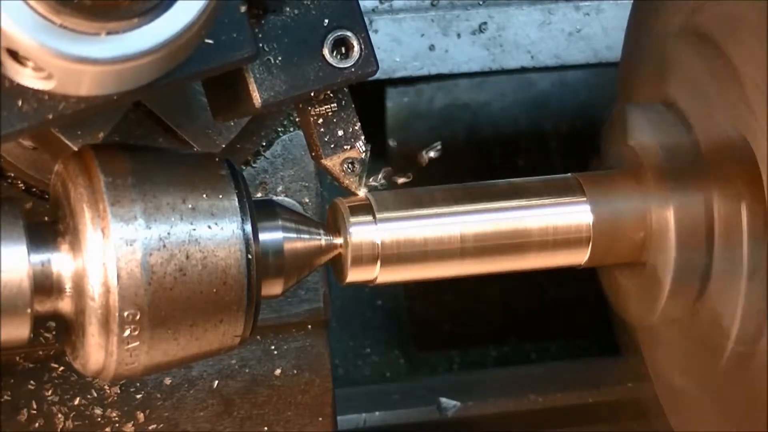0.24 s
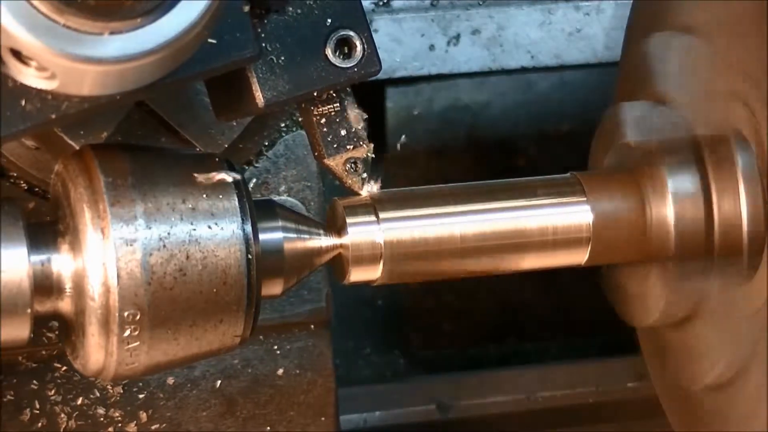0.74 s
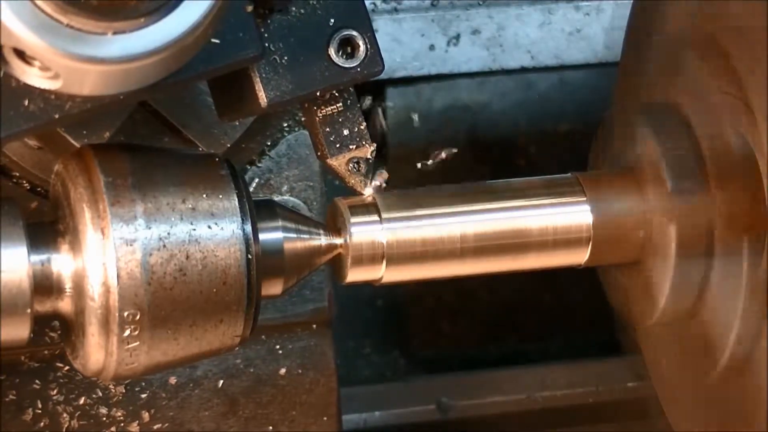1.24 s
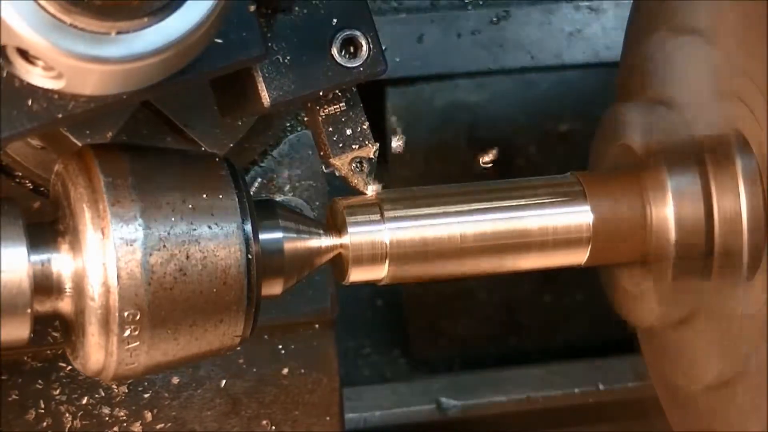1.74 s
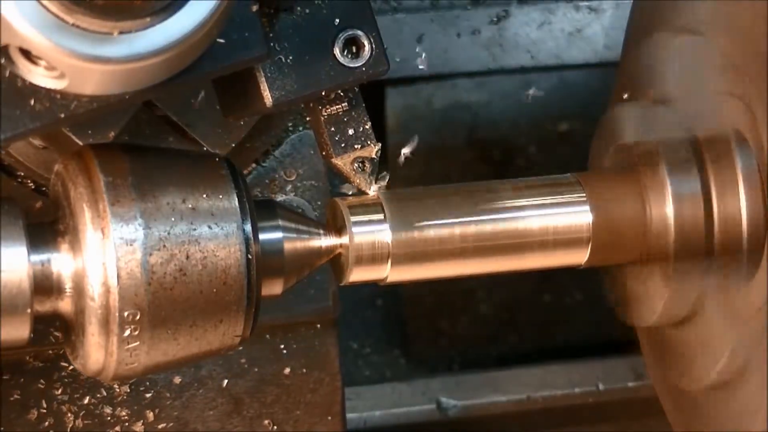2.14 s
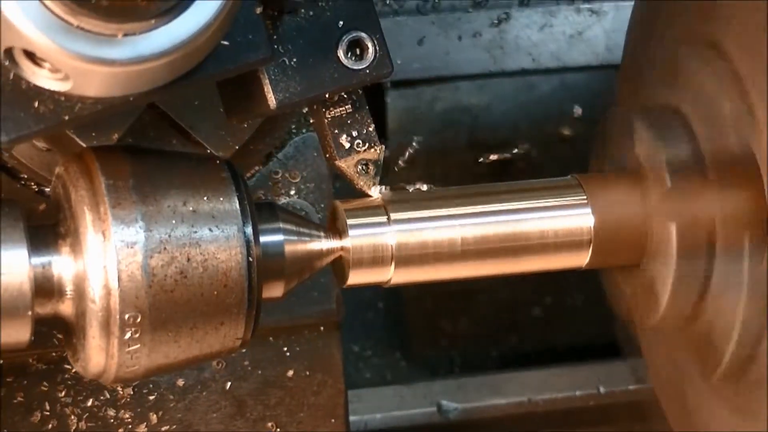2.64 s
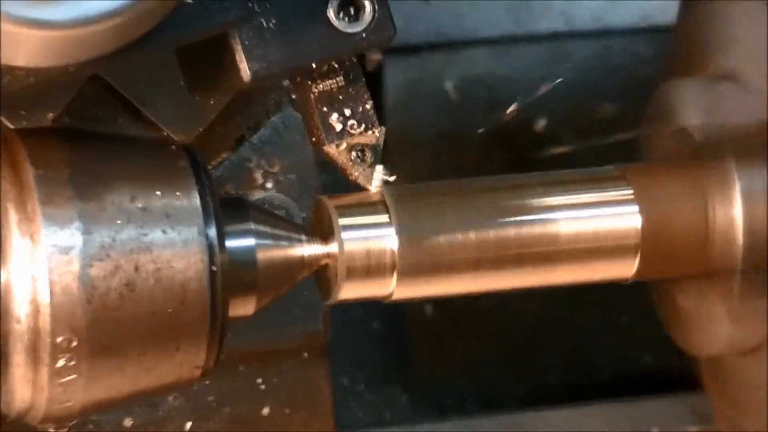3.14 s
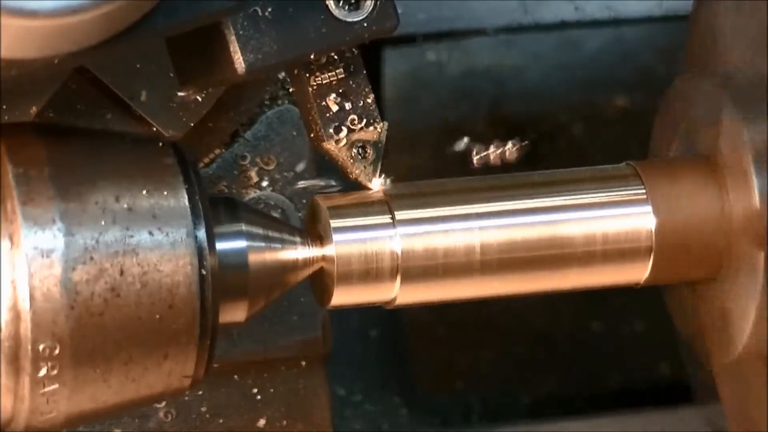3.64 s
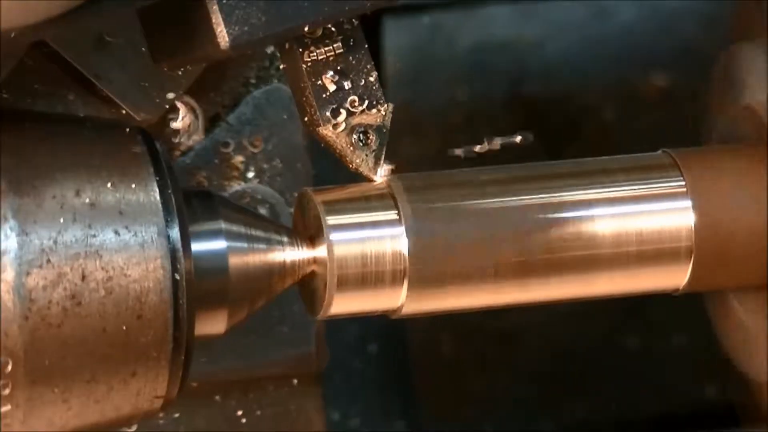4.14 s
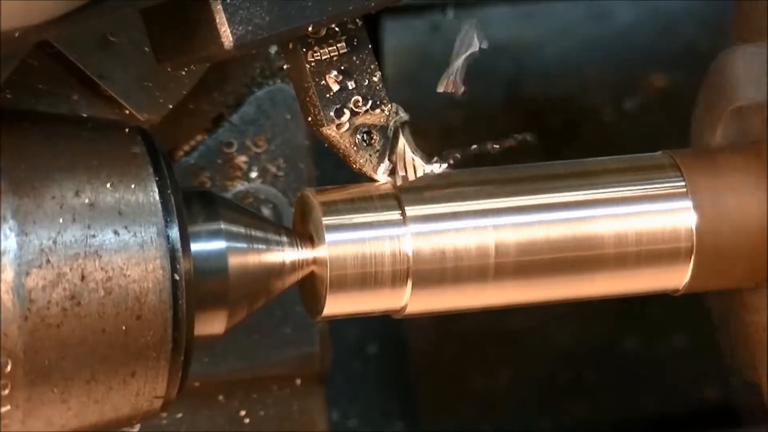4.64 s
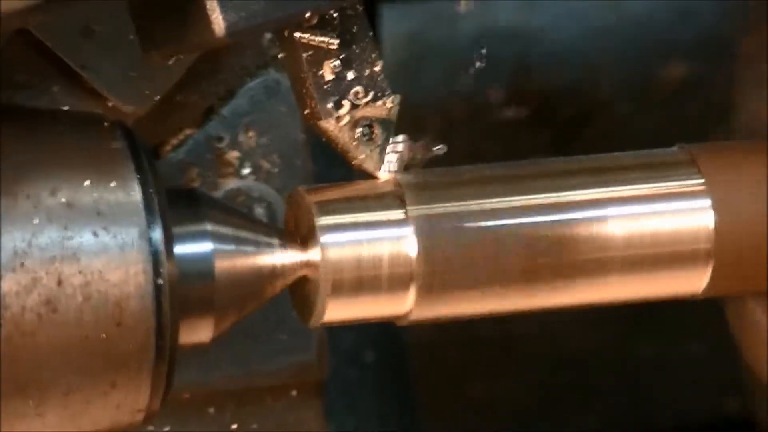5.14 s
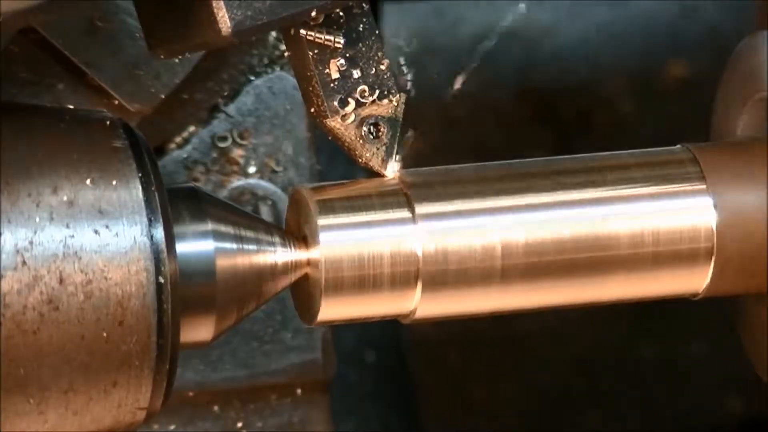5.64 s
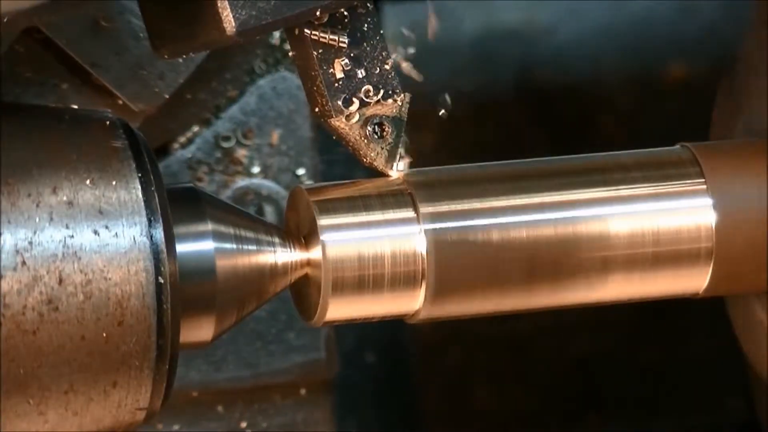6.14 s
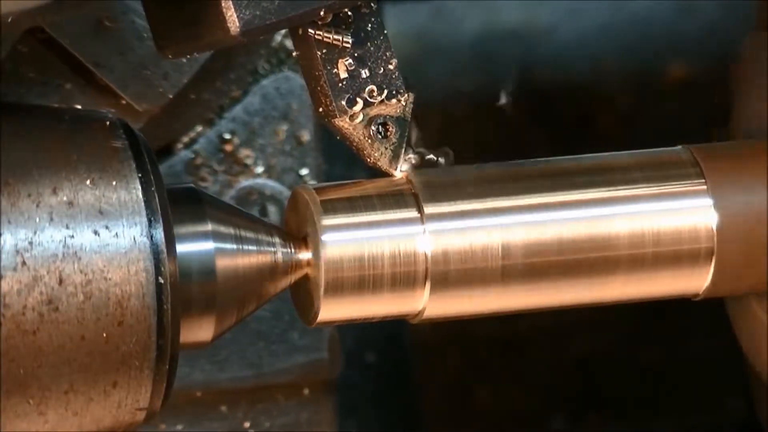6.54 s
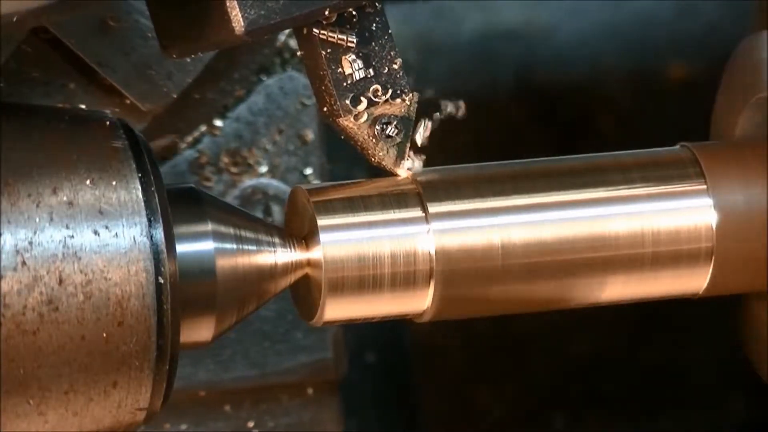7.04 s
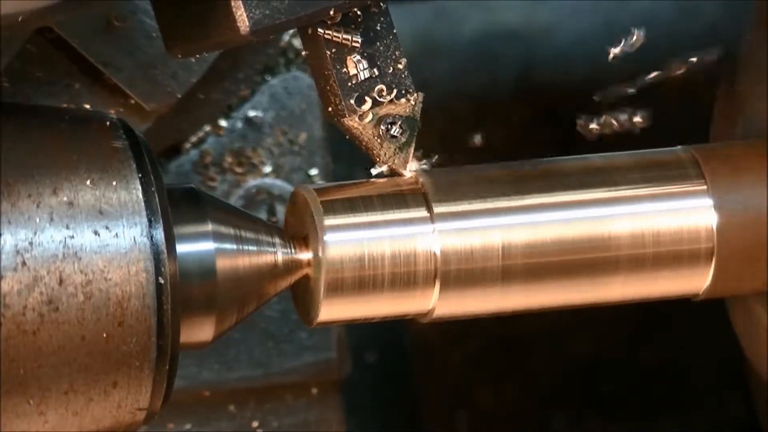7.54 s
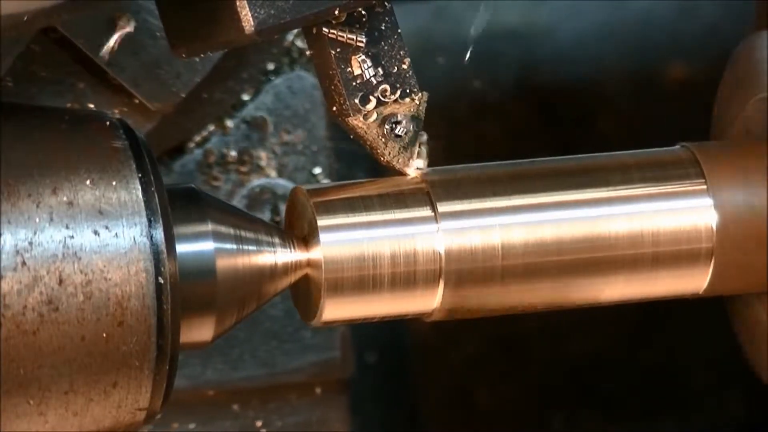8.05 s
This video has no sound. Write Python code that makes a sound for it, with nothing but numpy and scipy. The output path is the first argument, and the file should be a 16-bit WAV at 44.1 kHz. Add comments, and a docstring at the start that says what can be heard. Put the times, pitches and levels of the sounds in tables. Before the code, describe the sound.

Continuous loud lathe noise in close stereo: motor hum, steady gear tones and gritty, resonant metallic roar. The cut adds a rapid rotating throb, bright hiss, thin whistling chirps and irregular short pings. Small swarf pieces patter sharply on metal, often leaning left. Handling knocks come mostly between two and four seconds, another around five, with no start or stop.

```python
"""Roughing cut on a geared lathe

A carbide tool roughs a round bar turning about eleven times a second, heard from close by.
Hum and gear tones are wavering sines and combs of thin lines under the roar of the headstock, which is
noise coloured by the castings. The cut hisses, rings the tool, squeals and throws chips as short ticks.
Most of it throbs with the turn of the spindle; now and then a hand bumps the camera with a low knock."""
import sys
import numpy as np
from scipy import signal
from scipy.fft import rfft, irfft
from scipy.io import wavfile
from scipy.ndimage import uniform_filter1d

SR = 44100
rng = np.random.default_rng(int(sys.argv[2]) if len(sys.argv) > 2 else 0)


def master_out(mix):
    """Clip the mix to full scale and print it as 16-bit PCM to the path in sys.argv[1]."""
    frames = np.transpose(np.atleast_2d(mix))
    ceiling = np.clip(frames, -1, 1)
    pcm = np.round(ceiling * 32767).astype(np.int16)
    wavfile.write(sys.argv[1], SR, pcm)


N = 365148
T, HZ = np.arange(N) / SR, np.fft.rfftfreq(N, 1 / SR)

TURN_HZ = 10.9443  # spindle turns a second
MAINS_HZ = 120.02  # the motor's magnetic pull
MESH_TEETH, LAYSHAFT = 30, .4412  # teeth on the spindle gear; turns of its mate per spindle turn
CAGE, BALLS = .399, 1.601  # beats of the live centre's bearing per spindle turn

# Motor hum: multiple of the magnetic pull, level/dB
HUM = [(1, -59), (2, -50.5), (4, -38.5), (8, -56)]
# Strongest gear tones: multiple of the turn, level/dB
GEARS = [(24, -35), (24.44, -50), (25, -54.5), (30, -53), (31, -53), (33, -52.5), (38, -53.5), (48, -64),
         (54, -51.5), (59, -55), (60, -48), (65, -47), (83, -39.5), (84, -53), (90, -41.5), (91, -41.5),
         (92, -42.5), (95, -53), (102, -39.5), (104, -48), (105, -42.5), (119, -50), (120, -37),
         (127, -44.5), (150, -43)]
# Other tones of the drive: f/Hz, level/dB
TONES = [(1509.5, -44.5), (2490.7, -44.5)]
# Weaker gear orders, before the castings colour them: f/Hz, level/dB of each
TEETH = [(270, -76), (350, -55), (520, -71), (800, -53), (1100, -51.5), (1700, -55), (2200, -70),
         (2600, -61)]
# Broad colour of the roar, relative: f/Hz, level/dB per Hz
ROAR = [(20, -43), (100, -42), (230, -24.5), (440, -18.5), (520, -11), (570, -16.5), (830, -11), (950, -9),
        (2900, -8.5), (3400, -11.5), (5800, -11), (7200, -21.5), (11900, -38), (15600, -49)]
# Resonances of headstock, bar and tool post: f/Hz
CASTING_HZ = [995, 1035, 1130, 1203, 1312, 1480, 1570, 1642, 1760, 1878, 2058, 2097, 2260, 2605, 2799, 2897,
              2960, 3060, 3123, 3278, 3608, 3902, 4070, 4525, 4750, 4970, 5289, 5700, 6600, 530, 2295, 4265,
              4375, 4890, 6230]
# Shape of each of those resonances, in the same order: width/Hz, level/dB
CASTING_SHAPE = [(56, -13.5), (25, -30), (60, -9), (30, -6), (32.407, -26), (60, -10), (35, -9.5),
                 (34.8, -5), (50, -10), (80, -3), (30, -8), (30, -5), (120, -28), (80, -6), (39.3, -2),
                 (50, -3.5), (50, -6.5), (40, -5.5), (30, -4), (25, -3.5), (40, -5), (50, -4.5), (60, -8),
                 (80, -3.5), (140, -8), (50, -5), (80, -6), (270, -10.5), (300, -13.5), (30, -16.5),
                 (30, -5.5), (50, -16), (50, -6), (70, -8.5), (50, -20)]
# Notches where neighbouring modes cancel: f/Hz
NODES_HZ = [430, 555, 850, 1070, 1180, 1412, 1610, 2015, 2155, 2345, 2690, 2850, 4160]
# Course of the load, used about each column's mean:
# t/s, machine level/dB, cut hiss against the roar/dB, motor drone against the roar/dB
LOAD = [(0.0, -14.5, -13.5, 0.5), (1.5, -14, -15.5, 2), (2.7, -15, -14, 3), (4.2, -14.5, -14, 3),
        (5.3, -14, -17.5, 2.5), (5.8, -14, -15, 1), (8.28, -14.5, -16.5, 0.5)]
# Swell of each band of the roar at the bar's high spot: f/Hz, depth/dB per unit of swell
BITE = [(300, 1), (620, 0.2), (950, -4.5), (1600, 1), (2500, 0.52), (5500, -0.5), (8000, 2.7), (12000, 2)]
# Rattle of the gear train: beats a turn, depth/dB, first peak t/s
RATTLE = [(2, .7, .008), (4, .4, .001), (5, .55, .017), (11, .4, .002), (30, .7, .001)]
# Rings of the tool: f/Hz, width/Hz, level/dB rms, cage throb/dB, cage peak t/s, turn throb/dB
RINGS = [(4622, 128.3, -27, 2.0, 0.12, 2.5), (6150, 99.3, -31.5, 2.5, 0.21, 1),
         (8350, 1100, -37.5, 0, 0.14, 0.7), (9490, 49, -46.5, 3.5, 0.12, 0), (11240, 650, -49, 0, .13, 1.8)]
# Loudest breaks of the chip, near the bar's high spot: t/s, level/dB, f/Hz
PINGS = [(0.181, -19, 2240), (0.7277, -25, 2280), (1.0934, -21, 2270), (1.4576, -17, 2250),
         (1.5489, -19, 2190), (2.0991, -19, 2270), (2.1884, -19, 2180), (2.2812, -24, 2180),
         (2.3735, -18, 2260), (2.7357, -21, 2240), (2.828, -16, 2190), (2.921, -19, 2200),
         (3.011, -15, 2290), (3.1941, -19, 2260), (3.7444, -26, 2170), (3.927, -18, 2255),
         (4.1121, -20, 2170), (4.2911, -17, 2170), (4.3809, -17, 2260), (5.2051, -21, 2200),
         (5.474, -18, 2170), (8.2187, -21, 2180)]
# Loud chips landing: t/s, level/dB, body against the tick/dB, left over right/dB
CHIPS = [(0.7282, -25, -5, -3.0), (2.0083, -20, -6, -5), (2.2837, -22, 3, -4), (2.372, -17, -7, -4),
         (2.4149, -21, 5, -4), (2.5576, -17, -16, -3.5), (2.6594, -28, -2, -3), (2.7362, -26, -2, -7),
         (2.9113, -18, -9, -3), (3.2056, -23, 1, -3), (3.2824, -16, -4, -4), (3.5568, -24, -3, 1),
         (3.7529, -19, -7, -1), (5.2026, -21, 3, -5), (7.5113, -21, -3, -6), (7.6929, -21, -2, -5),
         (7.7638, -23, 3, -3), (7.9598, -25, 1, -4.0), (8.0556, -23, -3, -6.5), (8.1289, -23, -3, -3.0)]
# Throb of the squeal: beats a turn, depth/dB, first peak t/s
SQUEAL_THROB = [(CAGE, 1, 0.23), (2 * CAGE, 1.8, 0.045), (BALLS, 3.2, 0.0035), (1.3, 1, .003)]
# Moments when the tool tip breaks into chatter: start t/s, length/s, level/dB
CHIRPS = [(0.218, 0.04, -29), (0.388, 0.027, -23.5), (0.516, 0.029, -23), (0.627, 0.027, -25),
          (0.676, 0.021, -22), (0.727, 0.042, -22), (1.637, 0.036, -26), (1.767, 0.037, -25),
          (1.986, 0.04, -28), (2.04, 0.023, -23), (2.215, 0.03, -23), (2.54, 0.045, -27.5),
          (2.73, 0.025, -25), (3.42, 0.018, -19.5), (3.826, 0.024, -26), (4.148, 0.025, -22),
          (4.375, 0.028, -26), (4.514, 0.037, -27), (4.555, 0.031, -28), (4.774, 0.032, -26),
          (4.836, 0.041, -27), (4.947, 0.036, -26), (5.01, 0.031, -24), (5.065, 0.018, -20),
          (5.206, 0.041, -26), (5.47, 0.026, -27), (5.917, 0.079, -26), (6.11, 0.036, -25),
          (6.37, 0.03, -26), (6.773, 0.064, -24), (7.021, 0.021, -21), (7.124, 0.037, -21.5),
          (7.252, 0.033, -25), (7.287, 0.032, -24), (7.489, 0.027, -24), (7.58, 0.054, -28),
          (7.755, 0.037, -28), (7.826, 0.026, -23.5), (7.963, 0.03, -23.5), (8.208, 0.027, -20)]
# Knocks on the camera: t/s, level/dB, f/Hz
BUMPS = [(2.29, -44, 115), (2.335, -44, 130), (2.412, -38, 140), (2.884, -38, 150), (3.175, -28, 140),
         (3.239, -44, 115), (3.442, -46, 60), (3.872, -43, 125), (3.917, -41, 125), (5.057, -24, 155)]
# Likeness of the two ports: f/Hz, correlation from -1 to 1
SAME = [(60, -0.25), (130, -0.29), (210, 0.88), (500, 0.97), (1200, 0.95), (2700, 0.78), (4200, 0.95),
        (6300, 0.87), (7300, 0.53), (8200, 0.21), (11400, 0.62), (13400, -0.35), (15000, -0.05)]
# Balance of the two ports: f/Hz, left over right/dB
LEAN = [(60, 1), (160, -1), (270, -12.5), (450, -9.5), (740, -8.5), (1220, -5.5), (2010, -2.0),
        (3330, -1.5), (5500, 0.5), (6900, -2), (8300, -11.5), (10400, -0.2), (15000, -0.4)]
# Phase by which the left port leads: f/Hz, lead/rad
LEAD = [(100, .1), (260, .45), (1300, .75), (2700, .2), (3600, .4), (6300, -.25), (7300, -.9), (8400, .6),
        (10700, 0)]


def gain_of(db):
    """Decibels to amplitude."""
    return 10 ** (np.asarray(db) / 20)


def panned_gain(db, pan_db):
    """Left and right gains around a level, pan_db apart."""
    return gain_of(db + np.array([[pan_db / 2], [-pan_db / 2]]))


def evened(x):
    """Scales to rms 1."""
    return x / np.sqrt(np.mean(x ** 2) + 1e-20)


def read(points, hz):
    """Reads a curve on a log-frequency axis."""
    f, value = np.transpose(points)
    return np.interp(np.log(hz + 1), np.log(f + 1), value)


def add(mix, s, sound):
    """Mixes a sound in at s seconds."""
    part = mix[..., round(s * SR):][..., :sound.shape[-1]]
    part += sound[..., :part.shape[-1]]


def drift(hz, count):
    """Random wander of rms 1, smoothed below about hz, one row each."""
    knots = np.arange(0, T[-1] + .01, .005)
    memory = np.exp(-2 * np.pi * hz * knots[1])
    noise = rng.standard_normal((count, len(knots) + 999))
    rows = signal.lfilter([1], [1, -memory], noise)[:, 999:]  # settled part only
    return np.array([np.interp(T, knots, evened(row - row.mean())) for row in rows])


def beats(parts):
    """Sum of cosine throbs in dB, each locked to the spindle: (beats a turn, dB, first peak s)."""
    return sum(db * np.cos(2 * np.pi * k * TURN_HZ * (T - s)) for k, db, s in parts)


def load(axis):
    """One column of the load curve about its mean, in dB."""
    column = np.interp(T, *np.transpose(LOAD)[[0, axis]])
    return column - column.mean()


def mode(hz, width):
    """Squared power response of one resonance, top 1."""
    return 1 / (1 + ((HZ - hz) / (width / 1.8)) ** 2) ** 2


def ports(near, far):
    """Two microphone ports: the left hears a share of what the right hears, the rest from elsewhere."""
    same = np.clip(read(SAME, HZ), -1, 1)
    lean, lead = gain_of(read(LEAN, HZ)), read(LEAD, HZ)
    left = lean * np.exp(1j * lead) * (same * near + np.sqrt(1 - same ** 2) * far)
    # for independent near and far of equal power, the average of the ports keeps the level of near
    level = 2 / np.sqrt(1 + lean ** 2 + 2 * lean * same * np.cos(lead))
    return irfft(np.array([left, near]) * level, N)


def rumble():
    """Hands on the camera: low lumpy noise, largely alike at the two ports, stirred up by each bump."""
    steady_db, after_t60_s = -72, .7
    after_db, after_share = -56, 0.59  # level after a -25 dB bump, and how far it follows the bump
    low = irfft(np.sqrt(mode(92.0, 90.)) * rfft(rng.standard_normal((2, N))), N)
    stirred = 0
    for s, db, hz in BUMPS:
        start_db = after_db + after_share * (db + 25)
        rise = np.clip((T - s) / .02, 0, 1)
        stirred = stirred + rise * gain_of(start_db - 60 * abs(T - s) / after_t60_s)
    lumps = gain_of(2.0 * drift(6., count=1)[0])
    return evened(low + 0.55 * low[::-1]) * (gain_of(steady_db) + stirred) * lumps


def bumps():
    """A low knock of a few cycles through the camera body, its pitch sagging, with a faint scuff."""
    rise, ring, pan_db = 0.5, 1, -4  # cycles to rise, cycles to fade to about a third, left over right
    out = np.zeros((2, N))
    for s, db, hz in BUMPS:
        u = np.arange(6000) * hz / SR  # time in cycles
        sagging = np.cos(2 * np.pi * (u + 0.36 * (1 - np.exp(-u / 0.38))))
        knock = sagging * (1 - np.exp(-(u / rise) ** 2)) * np.exp(-u / ring)
        scuff = np.exp(-u / 1.2) * evened(uniform_filter1d(rng.standard_normal(len(u)), size=70))
        add(out, s, panned_gain(db, pan_db) * (knock / abs(knock).max() + 0.14 * scuff))
    return out


def motor_and_gears():
    """Sine tones that waver a little; the mating gear sways the phase of the mesh tones."""
    lines = [(k * MAINS_HZ, db) for k, db in HUM] + [(k * TURN_HZ, db) for k, db in GEARS] + TONES
    wobble, out = drift(0.75, count=8), np.zeros(N)
    runout = 0.74 * np.cos(2 * np.pi * (TURN_HZ * T - .1))  # the gear bites harder once a turn
    for i, (hz, db) in enumerate(lines):
        pitch_wobble, level_wobble = wobble[i % 4], wobble[4 + i % 4]
        phase = 2 * np.pi * (hz * T + rng.random()) + 0.0013 * hz * pitch_wobble
        if np.isclose(hz / TURN_HZ % MESH_TEETH, 0):
            phase += .85 * np.sin(2 * np.pi * LAYSHAFT * TURN_HZ * T)
        if i < len(HUM):
            sway_db = load(axis=3)
        else:
            sway_db = 0.0017 * hz * (level_wobble - runout)
        out += np.sqrt(2) * gain_of(db + sway_db + 0.78 * level_wobble) * np.sin(phase)
    return out


def housing():
    """Power response of the castings: broad colour plus resonances, notched where modes cancel."""
    node_width_hz, node_depth = 40, 0.68
    peaks = gain_of(read(ROAR, HZ)) ** 2
    for hz, (width, db) in zip(CASTING_HZ, CASTING_SHAPE):
        peaks = peaks + gain_of(db) ** 2 * mode(hz, width)
    nodes = sum(mode(hz, node_width_hz) for hz in NODES_HZ)
    return peaks * np.clip(1 - node_depth * nodes, .05, 1)


def teeth():
    """Tooth errors come round again each turn, some each second turn: a comb of thin lines."""
    order = HZ / TURN_HZ
    comb = 1 / (1 + ((order - np.round(order)) * TURN_HZ / 0.46) ** 2)
    comb += gain_of(-6.0) / (1 + ((order % 1 - .5) * TURN_HZ / 0.5) ** 2)  # each second turn
    line_gains = gain_of(2.5 * rng.standard_normal(4000).clip(-3, 1.5))
    uneven = line_gains[np.round(2 * order).astype(int).clip(0, 3999)]
    resonance = np.sqrt(housing()) / gain_of(read(ROAR, HZ))  # castings without their broad colour
    band = (HZ < TEETH[-1][0]) * (HZ > TEETH[0][0])
    lines = comb * uneven * gain_of(read(TEETH, HZ)) * resonance * band
    return irfft(lines * rfft(rng.standard_normal(N)), N) * np.sqrt(SR / 2)


def squeal():
    """A wavering whistle that swells with the cage and balls of the bearing, and breaks into chirps."""
    squeal_hz, floor_db = 6157, -35.5  # pitch, and level between the chirps, both before they waver
    edge_s = 0.02  # rise and fall of a chirp
    pitch_hz, flutter_db = drift(25., count=2) * [[10.], [2.]]
    level = gain_of(floor_db + beats(SQUEAL_THROB) + 2.4 * drift(9., count=1)[0])
    for s, length, db in CHIRPS:
        shape = np.clip(np.minimum(T - s, s + length - T) / edge_s + .5, 0, 1)
        level = np.maximum(level, gain_of(db) * np.sin(np.pi / 2 * shape) ** 2)
    whistle = np.sin(2 * np.pi * np.cumsum(squeal_hz + pitch_hz) / SR)
    return np.sqrt(2) * level * gain_of(flutter_db) * whistle


def chips():
    """Swarf on bed and guard: noise ticks with a short clack, loud ones over a patter of small ones."""
    out, t = np.zeros((2, N)), np.arange(900) / SR
    bright = signal.butter(2, [6500, 10500], "band", fs=SR)
    small = rng.random((900, 3)) * [T[-1], 14, -12]  # s, dB over the faintest, left over right dB
    patter = [(s, -42.0 + size_db, -3, pan_db) for s, size_db, pan_db in small]
    for s, db, body_db, pan_db in list(CHIPS) + patter:
        hiss = evened(signal.lfilter(*bright, rng.standard_normal(len(t))))
        tick = gain_of(-8.0 - 60 * t / 0.024) * hiss
        swell = t / .0005 * np.exp(1 - t / .0005)  # the body of the chip clacks for a few cycles
        body = gain_of(body_db + 9.0) * swell * np.sin(2 * np.pi * rng.uniform(4400, 5100) * t)
        add(out, s, panned_gain(db, pan_db) * (tick + body))
    return out


def pings():
    """Each break of the chip rings the tool post as a decaying sine with a noise crack, once a turn."""
    t60_s, crack_db = 0.065, -8
    soft_db, spread_db = -19, 26  # softer breaks: loudest, and how far below it they may fall
    out, t = np.zeros(N), np.arange(3000) / SR
    loud_turns = np.round(np.transpose(PINGS)[0] * TURN_HZ)
    chance = rng.random((int(T[-1] * TURN_HZ), 3))
    soft = []
    for turn, (early, softness, pitch) in enumerate(chance, start=1):
        if turn not in loud_turns:
            s = (turn - 0.0517 * early) / TURN_HZ
            soft.append((s, soft_db - spread_db * softness, 2180 + 160 * pitch))
    for s, db, hz in list(PINGS) + soft:
        ring = gain_of(-60 * t / t60_s) * (1 - np.exp(-t / 0.0003)) * np.sin(2 * np.pi * hz * t)
        crack_noise = uniform_filter1d(rng.standard_normal(len(t)), size=5)
        add(out, s, gain_of(db) * (ring + gain_of(crack_db - 60 * t / .012) * crack_noise))
    return out


def rings():
    """Narrow tool resonances driven by the cut; the live centre's bearing and the turn make them throb."""
    wander = 0.12  # rms stray of a ring's pitch, in widths
    out, chatter_db = 0, 1.3 * drift(45., count=1)[0]  # all rings flutter together
    for hz, width, db, cage_db, cage_s, turn_db in RINGS:
        throb_db = beats([(CAGE, cage_db, cage_s), (1, turn_db, .018)])
        noise = rfft(rng.standard_normal((2, N)))
        ring = signal.hilbert(irfft(np.sqrt(mode(hz, width)) * noise, N))
        stray_hz = wander * width * drift(5., count=1)[0]
        ring = (ring * np.exp(2j * np.pi * np.cumsum(stray_hz) / SR)).real
        shape = gain_of(throb_db + drift(12., count=1)[0] + chatter_db)
        out = out + gain_of(db) * rfft(evened(ring * shape))
    return out


def roar():
    """Friction, rattle and cut hiss: rough noise in bands, throbbing with the turn, rings the castings."""
    roar_db = -18.5
    colour, rattle_db = housing(), beats(RATTLE)
    turn = (T * TURN_HZ + 0.046) % 1
    # the bar's high spot: quick rise, slower fall
    high_spot = evened(np.exp(-turn / 0.58) + np.exp(-(1 - turn) / 0.12) - .27)
    grit = gain_of(0.8 * evened(uniform_filter1d(rng.exponential(1, N) ** 2 - 2, size=30)))
    scrape_db = 0.36 * drift(25., count=1)[0]  # the chip thickens and tears unevenly
    out, centres = 0, [hz for hz, db in BITE]
    for hz, bite_db in BITE:
        share = read([(c, float(c == hz)) for c in centres], HZ)  # bands crossfade between centres
        treble = np.clip(np.log(hz / 1000) / np.log(12), 0, 1)  # the cut rules the treble
        if hz == centres[1]:
            own_db = load(axis=3)  # motor drone
        else:
            own_db = (hz > centres[1]) * scrape_db
        low_db = 0.6 * (1 - treble) * drift(21.0, count=1)[0]
        cut_db = treble * (load(axis=2) + 1.2 * drift(8.3, count=1)[0])
        shape = gain_of(rattle_db + own_db + low_db + bite_db * high_spot + cut_db)
        shape = shape * grit ** np.sqrt(treble)
        out = out + np.sqrt(share * colour) * rfft(evened(shape * rng.standard_normal((2, N))))
    return gain_of(roar_db) * out / np.sqrt(np.mean(colour))


def scene():
    """The machine reaches both ports under its load curve; squeal, chips and camera noise are laid on top."""
    tones = rfft(motor_and_gears() + teeth() + pings())
    near, far = roar() + rings()
    machine = ports(near + tones, far + .5 * tones) * gain_of(load(axis=1))
    whistle = rfft(squeal())
    return machine + ports(whistle, whistle) / 1.1 + chips() + bumps() + rumble()


def record(dry):
    """A limiter ducks both channels for peaks above -2 dB and recovers slowly; then a treble cutoff."""
    edge_hz = 15720
    peak_db = 20 * np.log10(abs(dry).max(0) + 1e-9)
    fall_db = T * 40.  # the held peak falls 40 dB a second
    held_db = np.maximum.accumulate(peak_db + fall_db) - fall_db
    over_db = np.maximum(held_db + 2.0, 0)
    ducked = dry / gain_of(signal.lfilter(np.ones(12) / 12, 1, over_db))
    lowpass = signal.firwin(1023, edge_hz, window=("kaiser", 9), fs=SR)
    return signal.oaconvolve(ducked, lowpass[None], "same")


dry = scene()
out = record(dry)
master_out(out)
```